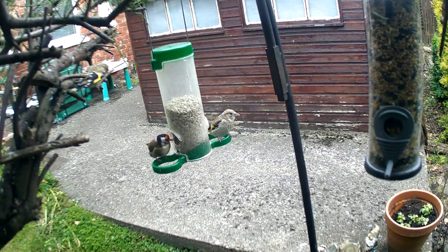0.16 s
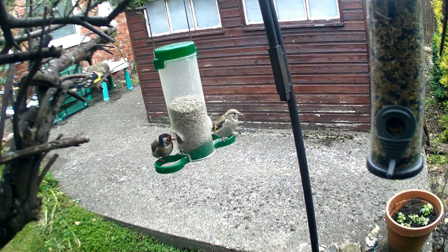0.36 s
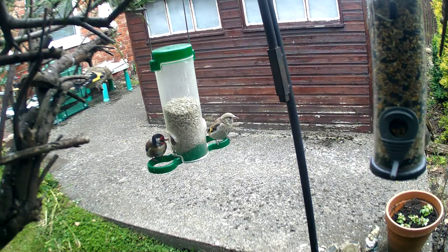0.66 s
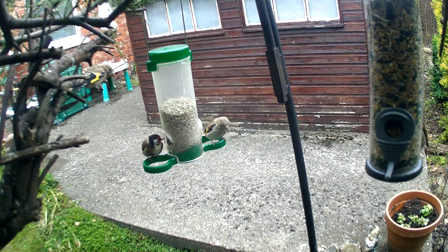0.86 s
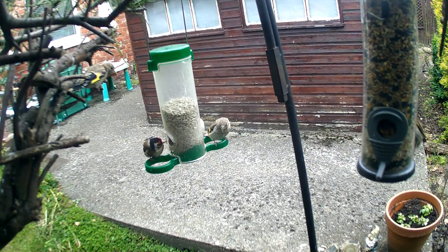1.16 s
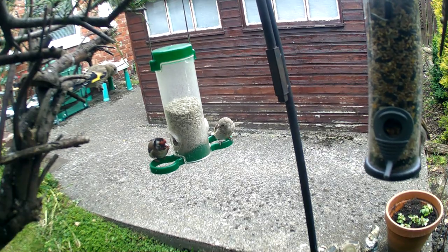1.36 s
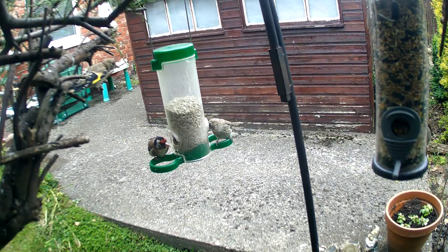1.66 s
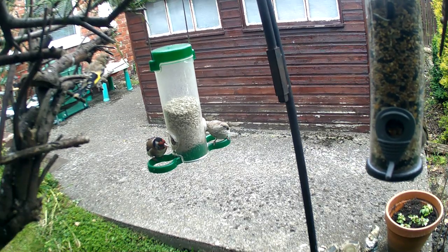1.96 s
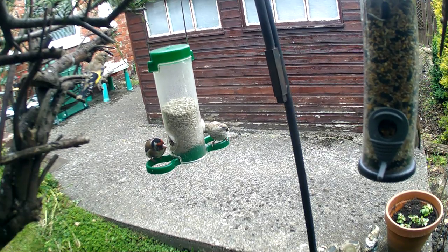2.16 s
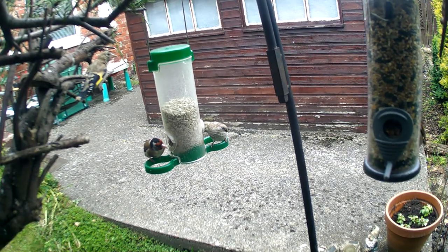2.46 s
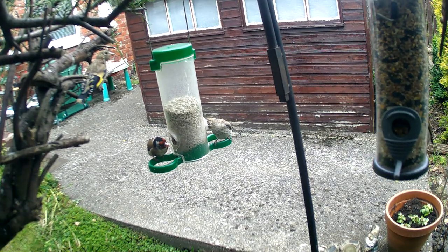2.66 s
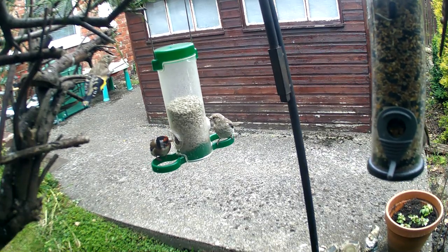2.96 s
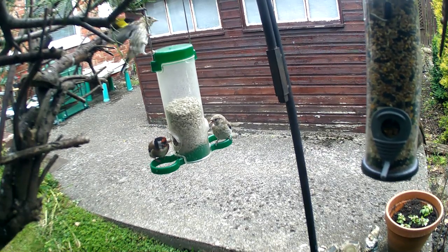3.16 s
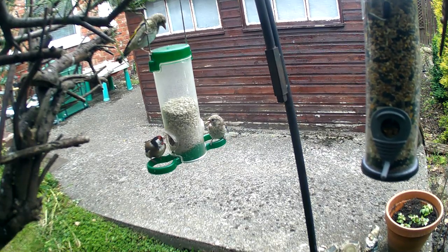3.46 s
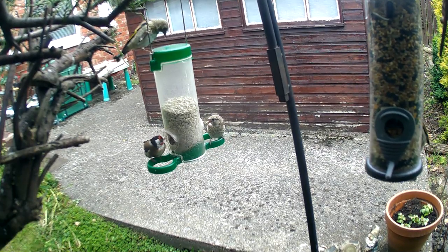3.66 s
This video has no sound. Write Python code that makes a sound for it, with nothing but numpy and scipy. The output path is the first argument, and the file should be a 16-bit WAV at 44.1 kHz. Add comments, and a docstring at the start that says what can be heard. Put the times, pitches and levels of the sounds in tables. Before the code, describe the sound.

Several small birds sing at once in a walled backyard: a soft mew and trill, then fluid whistles, squeals and buzzy chirps, later very high thin notes; faint crows and town rumble behind, outdoor stereo microphone.

```python
"""Garden bird chorus

Thrush-like whistlers, a squealer, a mewer, a high thin singer and a warbler: gliding sines with overtones.
A twitterer, a chatterer and sparrows: short repeated figures, slurs and buzzing arches. Walls answer all birds.
Behind: crows (pulses through throat resonances), a far flock, a wing flutter, town rumble and hiss (shaped noise)."""
import sys
import numpy as np
from scipy import signal
from scipy.fft import rfft, irfft, next_fast_len
from scipy.io import wavfile
from scipy.ndimage import uniform_filter1d, map_coordinates

SR = 44100
rng = np.random.default_rng(int(sys.argv[2]) if len(sys.argv) > 2 else 0)


def put_to_file(sound):
    """Save the sound as 16-bit audio at rate SR, in the file named by the first command-line argument."""
    columns = np.atleast_2d(sound).T  # one column per channel
    safe = np.clip(columns, -1, 1)
    whole_steps = np.round(safe * 32767)
    wavfile.write(sys.argv[1], SR, whole_steps.astype(np.int16))


def field_ratio(decibels):
    """Amplitude ratio for a level in dB (20 dB per decade); scalars and array-likes work."""
    return 10 ** (np.asarray(decibels, dtype=float) / 20)


N = 167580
T = np.arange(N) / SR

# Bird levels are in dB before overtone gains, pan and echo.
# Sung notes, one list a note: (time [s], pitch [Hz], level [dB])
WHISTLER_NOTES = [
    [(0.585, 2226, -48.5), (0.647, 2104, -45.5), (0.7, 2109, -54)],
    [(0.975, 2273, -49), (1.031, 2487, -41), (1.21, 2133, -43)],
    [(1.32, 1925, -62), (1.374, 2136, -44.5), (1.4, 2150, -36)],
    [(1.82, 1966, -63), (1.86, 2175, -45), (1.9, 2190, -42.5)],
    [(1.97, 2053, -60), (2.015, 2346, -43)],
    [(2.11, 2440, -45.5), (2.16, 2255, -43.5), (2.21, 2100, -46.5)],
    [(2.37, 2060, -51), (2.402, 2191, -43), (2.42, 2150, -37)],
    [(2.6, 2048, -61), (2.63, 2150, -40.5), (2.685, 2300, -50)],
]
LOW_WHISTLER_NOTES = [
    [(0.24, 1560, -55), (0.45, 2113, -48)],
    [(0.75, 1733, -48), (0.848, 1764, -45.5), (0.88, 1692, -68)],
    [(1.52, 1896, -53.5), (1.66, 1893, -48)],
    [(1.735, 1903, -51.5), (1.827, 1827, -47.5), (1.85, 1945, -45)],
    [(2.01, 1600, -38), (2.024, 1810, -52), (2.065, 2145, -41)],
    [(2.28, 1957, -42), (2.306, 1808, -45), (2.5, 1716, -51.5)],
]
SQUEALER_NOTES = [
    [(.7, 2800, -47.5), (.74, 3787, -57.5), (.78, 3930, -56.5), (.82, 3600, -55.5), (.85, 2914, -47),
     (.92, 2240, -70)],
    [(1.52, 2250, -56), (1.55, 2638, -53), (1.62, 2670, -53), (1.7, 2507, -55.5), (1.745, 2300, -47.5)],
    [(2.04, 2350, -48), (2.07, 2643, -53.5), (2.11, 2710, -55), (2.2, 2540, -49), (2.27, 2334, -53)],
]
MEWER_NOTES = [
    [(.04, 1103, -66), (.075, 1269, -62.5), (.095, 1586, -59.5), (.22, 1539, -57), (.42, 1407, -61)],
]
TRILL_NOTES = [
    [(0.185, 2590, -52), (0.258, 2368, -50), (0.47, 2270, -45.5)],
]
HIGH_SINGER_NOTES = [
    [(2.27, 7770, -34.5), (2.29, 7500, -42.5), (2.33, 7160, -44), (2.42, 6990, -36.5), (2.465, 6750, -49)],
    [(2.55, 7830, -28.5), (2.57, 7340, -42.5), (2.61, 7060, -44.5), (2.69, 7040, -42.5), (2.735, 6630, -48)],
    [(3.03, 4960, -39), (3.05, 4735, -45.5), (3.11, 4850, -60)],
    [(3.12, 4680, -42), (3.2, 4670, -63), (3.25, 4734, -42.5), (3.3, 4650, -71)],
    [(3.32, 4580, -50), (3.44, 4645, -48.5), (3.49, 4565, -57)],
    [(3.51, 4620, -57), (3.54, 4600, -47), (3.63, 4586, -76)],
    [(3.64, 5110, -60), (3.71, 4350, -61), (3.78, 3700, -62)],
]
WARBLER_NOTES = [
    [(1.26, 5050, -71), (1.36, 5790, -55)],
    [(2.81, 5860, -45.5), (2.84, 5660, -49.5), (2.865, 5480, -50), (2.92, 5290, -59)],
    [(2.935, 5970, -47), (2.975, 5320, -50), (2.995, 5760, -55), (3.025, 5150, -47.5)],
    [(2.76, 3250, -51), (2.795, 3400, -54), (2.84, 2916, -56), (2.88, 3390, -55), (2.925, 2820, -60.5),
     (2.965, 3600, -48), (2.99, 3390, -55)],
    [(3.06, 3280, -50), (3.086, 3730, -50), (3.12, 3760, -58)],
]
# Twitter figures: (start [s], level [dB])
TWITTER_STARTS = [(1.012, -55), (1.085, -53), (1.156, -52)]
# One twitter figure, a dive then an arch: (time after start [s], pitch [Hz])
TWITTER_FIGURE = [(0, 6500), (.012, 3000), (.022, 4300), (.033, 4950), (.038, 4500), (.045, 2500)]
# Quick slurs: (start [s], length [s], first pitch [Hz], last pitch [Hz], level [dB])
SLUR_EVENTS = [(0.063, 0.047, 4600, 3300, -70), (.485, 0.042, 3064, 3150, -49.5),
               (.505, 0.044, 1578, 2300, -48.5), (0.535, 0.013, 2450, 4200, -47),
               (0.543, 0.014, 3050, 2100, -45), (0.564, 0.021, 2100, 3350, -42.5),
               (.58, 0.027, 3260, 2900, -57), (0.591, 0.0122, 2070, 2740, -39),
               (.667, 0.012, 2640, 4850, -46.5), (0.673, 0.0092, 2550, 3350, -40),
               (0.699, 0.019, 2130, 3350, -47), (0.837, 0.065, 4060, 3850, -61.5),
               (2.179, 0.092, 5850, 5100, -60.5), (2.542, .007, 5300, 7600, -55.5),
               (2.8, 0.019, 6100, 6950, -47.5), (2.924, 0.011, 6070, 6850, -53)]
# Sparrow chirps: (start [s], length [s], first pitch [Hz], pitch at 40 % [Hz], last pitch [Hz], first level [dB])
SPARROW_CHIRPS = [(.315, 0.052, 3640, 5340, 4100, -52.5), (.35, 0.098, 4500, 4764, 4260, -45),
                  (.39, .09, 3700, 3500, 3010, -47.5), (.84, 0.067, 5600, 5310, 4800, -59),
                  (1.365, 0.08, 3884, 4484, 4210, -45.5), (1.4, 0.051, 3800, 3680, 3240, -44.5),
                  (1.43, 0.062, 4490, 4460, 3820, -55), (2.275, 0.048, 3687, 4600, 2830, -38),
                  (2.315, 0.048, 4060, 4380, 3100, -42.5), (2.353, 0.078, 3600, 3520, 2920, -48),
                  (3.116, 0.031, 2610, 3960, 3400, -43.5), (3.13, 0.061, 3695, 4515, 2920, -40.5),
                  (3.2, 0.052, 4300, 3840, 3090, -49), (3.27, 0.056, 3970, 4380, 2870, -53),
                  (3.36, 0.071, 3800, 4050, 3230, -62)]
# Crow caws: (start [s], length [s], pitch [Hz], first throat resonance [Hz], last resonance [Hz], level [dB])
CROW_CAWS = [(1.82, 0.24, 299.3, 1306, 1200, -52.5), (2.609, 0.43, 301.8, 1406, 1340, -52.5),
             (3.54, 0.28, 304, 1340, 1347, -56)]
# Singers' places, by name: (left over right [dB], echo [dB])
SINGER_PLACES = {"whistler": (-1.5, -4.5), "low": (1, -1.9), "squealer": (-1.2, 0), "high": (-1.8, -0.45),
                 "warbler": (1, 1), "twitter": (1, -13), "sparrow": (1.5, 0.84), "crow": (0.48, 1.33),
                 "far": (0, 9.05)}
# Decay of the far walls: (frequency [Hz], t60 [s])
WALL_T60 = [(1000, 1), (8000, 0.7)]
# Town floor spectrum: (frequency [Hz], relative level [dB])
TOWN_SPECTRUM = [(25, -16), (50, -12), (150, -1.5), (300, -3.5), (800, -6), (1070, -9), (2200, -12),
                 (5000, -23), (6300, -23.5), (9500, -18), (12200, -19), (15600, -25.5)]
# Left-right correlation of the town floor: (frequency [Hz], correlation [-1..1])
TOWN_LIKENESS = [(25, 0.044), (125, 0.45), (300, -0.24), (1000, 0.011), (8000, 0.12), (13000, 0.08)]
# Drone level before pan: (time [s], level [dB])
DRONE_LEVEL = [(0, -67), (.8, -64.5), (1, -58.5), (1.6, -63.5), (3.8, -67.5)]
# Overtone stacks: (multiple of the pitch [ratio], gain [dB])
PURE_TONES = [(1, 0)]
FLUTE_TONES = [(1, 5.5), (3, -21.5), (5, -27)]
SQUEAL_TONES = [(1, 6.5), (1.5, -1)]
MEW_TONES = [(1, 0), (2, -2.5)]
CHIRP_TONES = [(1, 2.5), (2, -16.5)]

# Throats: (pitch waver [Hz], flutter [dB], knots [1/s])
CLEAR, HUSKY, HOARSE = (22, 2.2, 70), (84, 2.7, 200), (110, 4.5, 200)
BEADY, BROKEN = (51.7, 1.87, 100), (98.6, 4.54, 180)
# Overtone loss per octave below a note's top; negative grows
FLUTE_DULLS_DB, SQUEAL_DULLS_DB, MEW_DULLS_DB = 60, 50, -34
FADE_S, QUICK_FADE_S = 0.008, 0.002
TRILL_HZ, TRILL_DEPTH = 59.5, 0.91
BUZZ_HZ, BUZZ_DEPTH = 310, 0.4
CAW_WIDTH_HZ, CAW_JITTER = 360, 0.08
CAW_UPPER_RATIO, CAW_UPPER_DB = 1.52, -3.5
TOWN_DB, TOWN_SWELL_DB_PER_S, TOWN_PAN_DB = -55, 0.71, -1.5
DRONE_HZ, DRONE_WIDTH_HZ = 210, 13
WING_START_S, WING_LENGTH_S, WING_DB, WING_BEAT_HZ = 2.72, 0.45, -61, 21
WING_LOW_HZ, WING_HIGH_HZ = 8000, 13000
FAR_CHIRPS_PER_S, FAR_CHIRP_S = 50, 0.033
FAR_HZ, FAR_SPREAD_NEPER, FAR_SWEEP_NEPER = 3400, 0.21, 0.21
FAR_DB, FAR_SPREAD_DB = -68.5, 2.5
NEAR_WALL_T60_S, NEAR_WALL_DB = 0.13, 5.5
LEFT_LEAD_MS = 0.028


def unit(x):
    """Scale to rms 1."""
    return x / np.sqrt(np.mean(x ** 2) + 1e-20)


def along(points, hz):
    """Interpolate (frequency [Hz], value) points on a log axis."""
    f, v = np.transpose(points)
    return np.interp(np.log(hz + 1), np.log(f + 1), v)


def wobble(knots_per_s):
    """Smooth random curve through normal-distributed knots."""
    knots = rng.standard_normal(int(N * knots_per_s / SR) + 4)
    return map_coordinates(knots, [T * knots_per_s])


def filtered(x, response):
    """Multiply the spectrum of x by a complex response of frequency."""
    m = next_fast_len(N + 8192)
    return irfft(rfft(x, m) * response(np.fft.rfftfreq(m, 1 / SR)), m)[..., :N]


def sing(notes, tones, voice, dulls_db=0, fade_s=FADE_S):
    """Gliding sines with rounded turns, overtones, short fades and an unsteady throat."""
    waver_hz, flutter_db, knots_per_s = voice
    out, waver = np.zeros(N), waver_hz * wobble(knots_per_s)
    for note in notes:
        s, hz, db = np.transpose(note)
        on = slice(int(s[0] * SR), int(s[-1] * SR))
        t = T[on]
        rounding = min(len(t) // 8 + 1, SR // 150)
        glide = uniform_filter1d(np.interp(t, s, hz), size=rounding, mode="nearest")
        ramp_s = min(fade_s, (s[-1] - s[0]) / 4)
        fade = np.clip(np.minimum(t - s[0], s[-1] - t) / ramp_s, 0, 1)
        phase = 2 * np.pi * np.cumsum(glide + waver[on]) / SR
        dull_db = dulls_db * np.log2(glide / hz.max())
        stack = sum(field_ratio(g + dull_db * (k > 1)) * np.sin(k * phase) for k, g in tones)
        out[on] += 2 ** .5 * field_ratio(np.interp(t, s, db)) * fade * stack
    return out * unit(field_ratio(flutter_db * wobble(knots_per_s)))


def chirping(chirps):
    """Hoarse parabolic pitch arches, each losing 6 dB, amplitude-modulated into a buzz."""
    u = np.linspace(0, 1, 25)
    arches = []
    for start_s, length_s, first_hz, mid_hz, last_hz, db in chirps:
        arch_hz = np.polyval(np.polyfit([0, .4, 1], [first_hz, mid_hz, last_hz], deg=2), u)
        arches.append(np.transpose([start_s + length_s * u, arch_hz, db - 6 * u]))
    buzz = 1 + BUZZ_DEPTH * np.sin(2 * np.pi * BUZZ_HZ * T + wobble(40))
    return sing(arches, CHIRP_TONES, HOARSE) * unit(buzz)


def placed(x, name):
    """Panned direct sound plus decaying-noise echoes of near and far walls, different on each side."""
    pan_db, echo_db = SINGER_PLACES[name]
    hz, t, noise = signal.stft(rng.standard_normal((2, SR)), SR, nperseg=256)
    far_wall = field_ratio(-60 * t / along(WALL_T60, hz)[:, None])
    near_wall = field_ratio(NEAR_WALL_DB - 60 * t / NEAR_WALL_T60_S)
    tail = signal.istft(noise * (far_wall + near_wall), SR, nperseg=256)[1]
    delayed = np.pad(x, (200, 0))[None]
    echo = signal.fftconvolve(delayed, tail / np.linalg.norm(tail[0]), axes=1)[:, :N]
    left = filtered(x, lambda f: np.exp(2j * np.pi * f * LEFT_LEAD_MS / 1000))
    return (np.array([left, x]) + field_ratio(echo_db) * echo) * field_ratio([[pan_db / 2], [-pan_db / 2]])


def town():
    """Far traffic and air: slowly swelling shaped stereo noise with a narrow-band drone."""
    def mid_side(hz):
        # mid/side angle that gives the wanted left-right correlation
        angle = np.arccos(np.clip(along(TOWN_LIKENESS, hz), -1, 1)) / 2
        return field_ratio(along(TOWN_SPECTRUM, hz)) * [np.cos(angle), np.sin(angle)]

    mid, side = filtered(rng.standard_normal((2, N)), mid_side)
    level_db = TOWN_DB + TOWN_SWELL_DB_PER_S * T + 0.18 * wobble(7.3)
    floor = field_ratio(level_db) * unit(np.array([mid + side, mid - side]))
    band = filtered(rng.standard_normal((2, N)), lambda hz: np.exp(-((hz - DRONE_HZ) / DRONE_WIDTH_HZ) ** 2))
    drone = field_ratio(np.interp(T, *np.transpose(DRONE_LEVEL))) * unit(band)
    return (floor + drone) * field_ratio([[TOWN_PAN_DB / 2], [-TOWN_PAN_DB / 2]])


def far_flock():
    """Random chirps far off, one at a jittered time in each equal slot."""
    count = int(FAR_CHIRPS_PER_S * N / SR) - 2
    pitch, sweep, level, jitter = rng.standard_normal((count, 4)).T
    start_s = (np.arange(count) + .5 + np.tanh(jitter) / 2) / FAR_CHIRPS_PER_S
    length_s = np.full(count, FAR_CHIRP_S)
    first_hz = FAR_HZ * np.exp(FAR_SPREAD_NEPER * pitch)
    mid_hz = first_hz * (1 + FAR_SWEEP_NEPER * np.abs(sweep) / 2)
    last_hz = first_hz * np.exp(-FAR_SWEEP_NEPER * np.abs(sweep))
    return chirping(zip(start_s, length_s, first_hz, mid_hz, last_hz, FAR_DB + FAR_SPREAD_DB * level))


def crows():
    """Uneven pulses through two throat resonances that shift during each caw."""
    def ring(f, centre_hz):
        damping = 1j * f * CAW_WIDTH_HZ
        return (damping / (centre_hz * centre_hz - f * f + damping)) ** 2

    def throat(pulses, hz):
        upper = field_ratio(CAW_UPPER_DB)
        return unit(filtered(pulses, lambda f: ring(f, hz) - upper * ring(f, hz * CAW_UPPER_RATIO)))

    out = np.zeros(N)
    for start_s, length_s, pitch_hz, first_hz, last_hz, db in CROW_CAWS:
        cycles = np.cumsum(pitch_hz * (1 + CAW_JITTER * wobble(200))) / SR
        pulses = np.diff(np.floor(cycles), prepend=0) * field_ratio(2.8 * wobble(90))
        early, late = throat(pulses, first_hz), throat(pulses, last_hz)
        u = np.clip((T - start_s) / length_s, 0, 1)
        out += field_ratio(db) * np.sin(np.pi * u) ** .5 * (early * (1 - u) + late * u)
    return out


def wings():
    """A bird flutters onto a branch: band-limited feather rustle in soft beats."""
    def band(f):
        return f * f / (f * f + WING_LOW_HZ ** 2) / (1 + (f / WING_HIGH_HZ) ** 4)

    rustle = unit(filtered(rng.standard_normal((2, N)), band))
    swell = np.sin(np.pi * np.clip((T - WING_START_S) / WING_LENGTH_S, 0, 1))
    beats = 1 + .5 * np.sin(2 * np.pi * WING_BEAT_HZ * T)
    return field_ratio(WING_DB) * swell * beats * rustle


def sparrows():
    """Chirps: hoarse buzzing pitch arches."""
    return chirping(SPARROW_CHIRPS)


def twitterer():
    """One dive-and-arch sine figure, repeated."""
    figures = [[(s + d, hz, db) for d, hz in TWITTER_FIGURE] for s, db in TWITTER_STARTS]
    return sing(figures, PURE_TONES, CLEAR, fade_s=QUICK_FADE_S)


def chatterer():
    """Quick scratchy slurs: straight glides with a husky waver."""
    slurs = [[(s, a, db), (s + d, b, db)] for s, d, a, b, db in SLUR_EVENTS]
    return sing(slurs, PURE_TONES, HUSKY)


def warbler():
    """Gliding notes with a second harmonic and a broken throat."""
    return sing(WARBLER_NOTES, CHIRP_TONES, BROKEN)


def high_singer():
    """High thin notes: single wavering sines."""
    return sing(HIGH_SINGER_NOTES, PURE_TONES, BEADY)


def mewer():
    """A mewing glide whose octave overtone grows as the pitch falls."""
    return sing(MEWER_NOTES, MEW_TONES, CLEAR, MEW_DULLS_DB)


def squealer():
    """Squeals with a partial at 1.5 times the pitch, weaker as the pitch falls."""
    return sing(SQUEALER_NOTES, SQUEAL_TONES, BEADY, SQUEAL_DULLS_DB)


def trill():
    """A sine glide pulsed fast in amplitude."""
    pulsing = 1 + TRILL_DEPTH * np.sin(2 * np.pi * TRILL_HZ * T + 0.63)
    return sing(TRILL_NOTES, PURE_TONES, CLEAR) * pulsing


def low_whistler():
    """The lower thrush-like voice: plain sines."""
    return sing(LOW_WHISTLER_NOTES, PURE_TONES, BEADY)


def whistler():
    """The main thrush-like voice: odd harmonics that weaken as a note falls."""
    return sing(WHISTLER_NOTES, FLUTE_TONES, CLEAR, FLUTE_DULLS_DB)


def scene():
    """All singers in their places over the town."""
    voices = {
        "far": far_flock(),
        "crow": crows(),
        "sparrow": sparrows(),
        "twitter": twitterer(),
        "warbler": warbler() + chatterer(),
        "high": high_singer(),
        "squealer": squealer(),
        "low": low_whistler() + mewer(),
        "whistler": whistler() + trill(),
    }
    return town() + wings() + sum(placed(x, name) for name, x in voices.items())


def band_limit(x):
    """A steep low-pass at the top of the band."""
    return signal.sosfilt(signal.butter(12, 15650, fs=SR, output="sos"), x)


def record(dry):
    """The finished stereo sound."""
    return band_limit(dry)


dry = scene()
out = record(dry)
put_to_file(out)
```